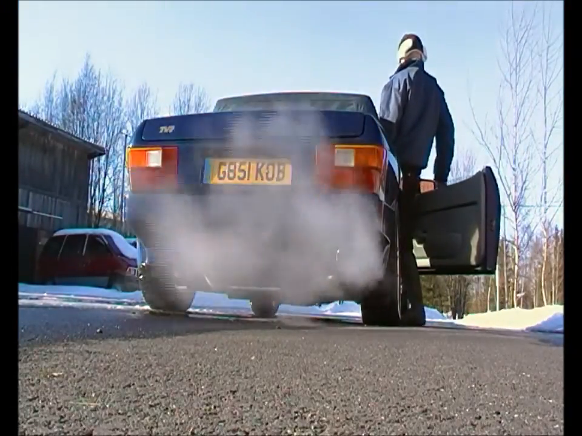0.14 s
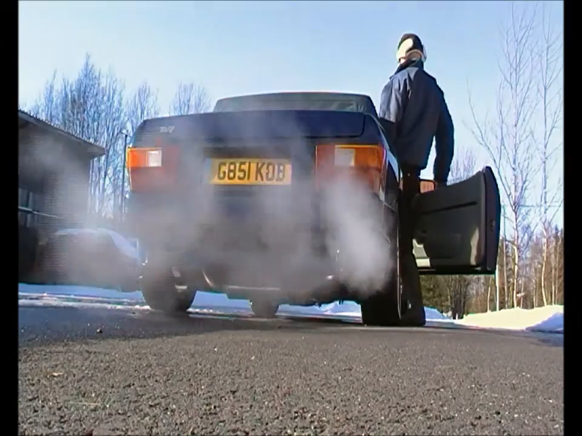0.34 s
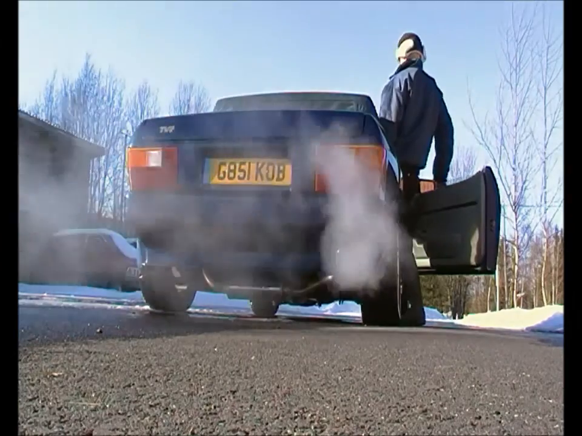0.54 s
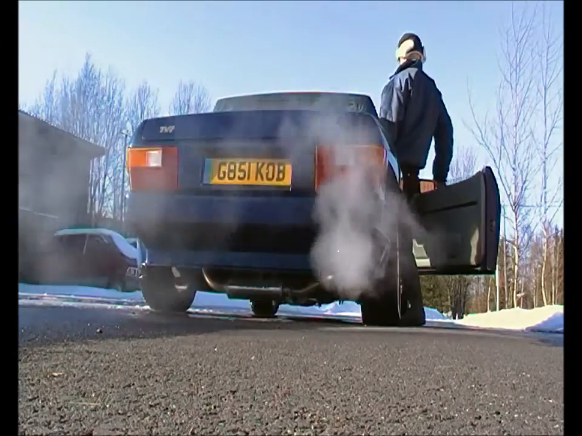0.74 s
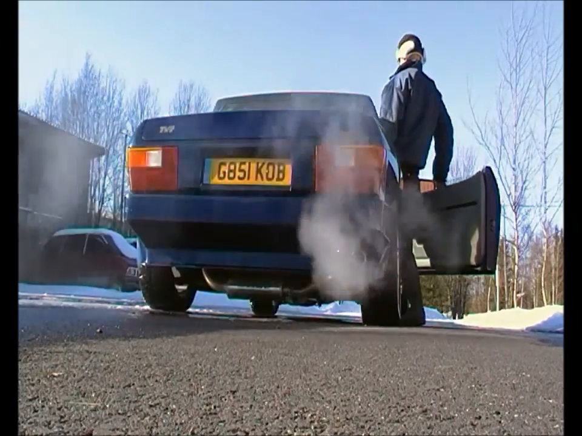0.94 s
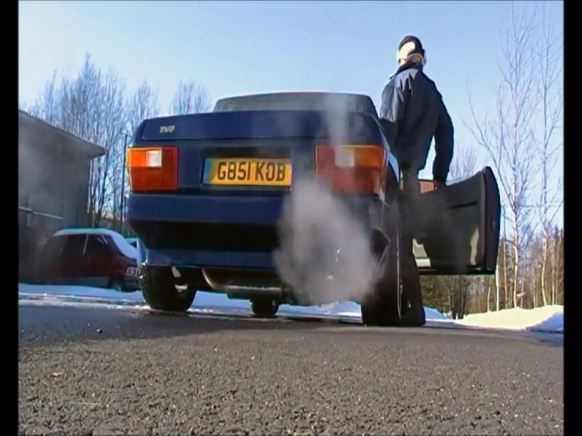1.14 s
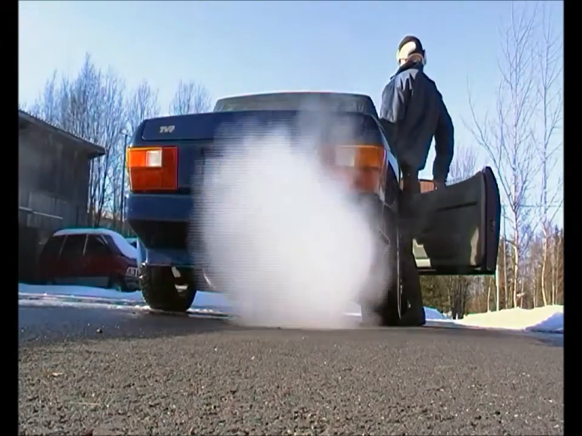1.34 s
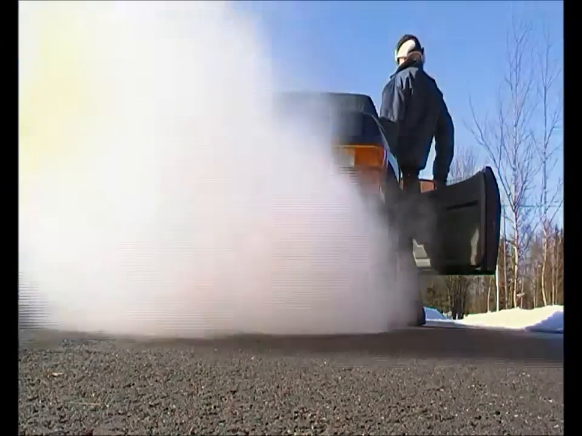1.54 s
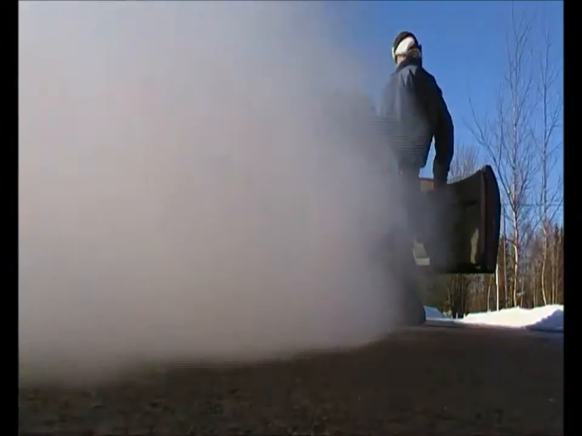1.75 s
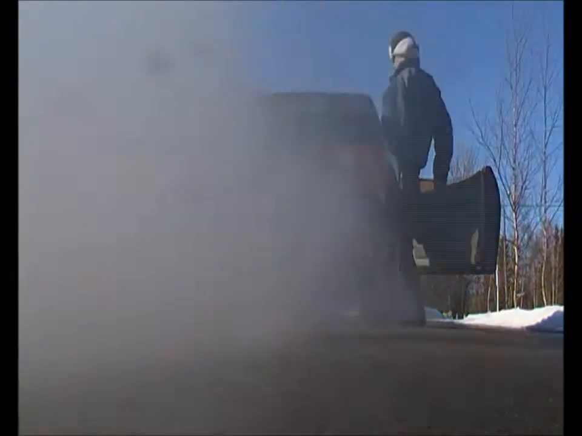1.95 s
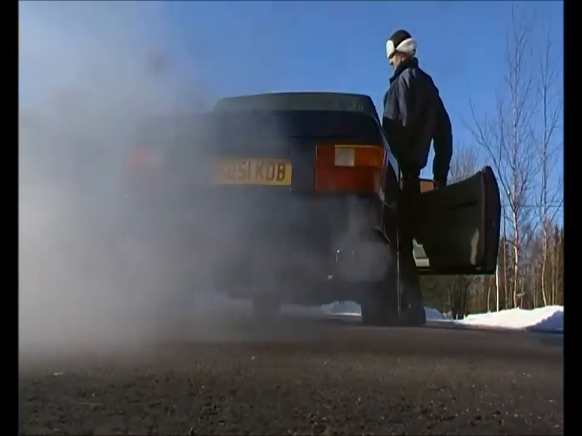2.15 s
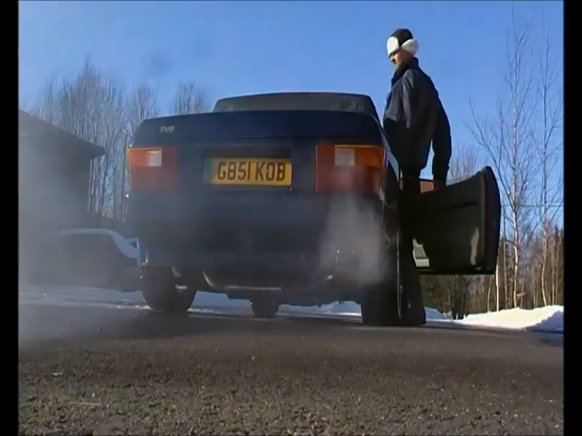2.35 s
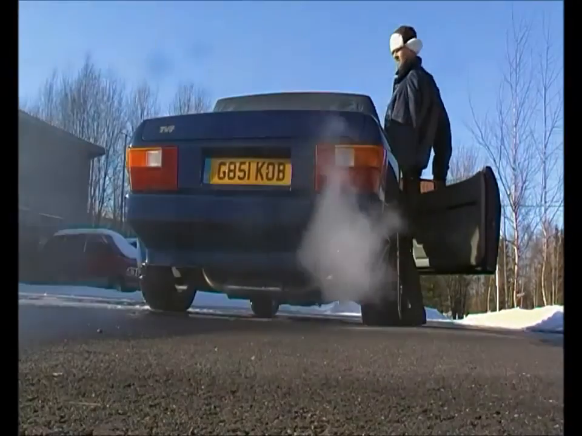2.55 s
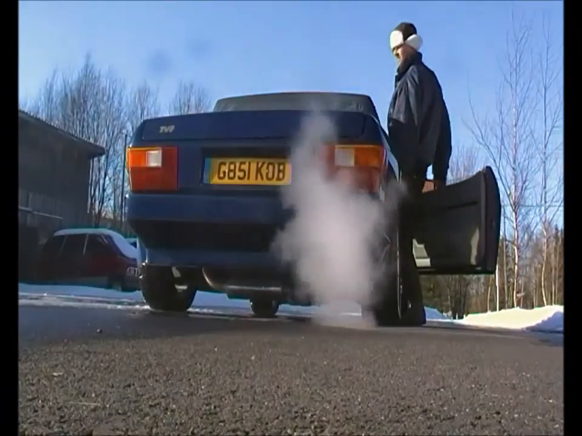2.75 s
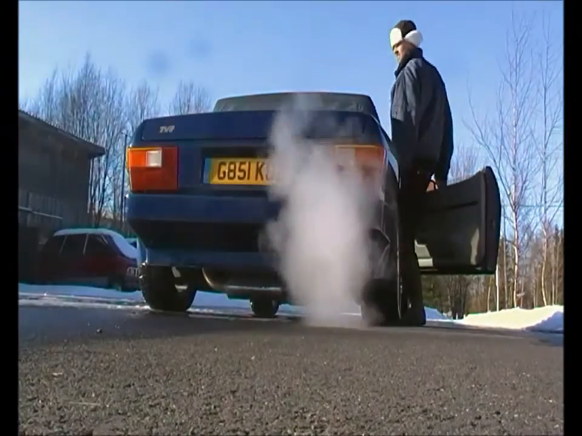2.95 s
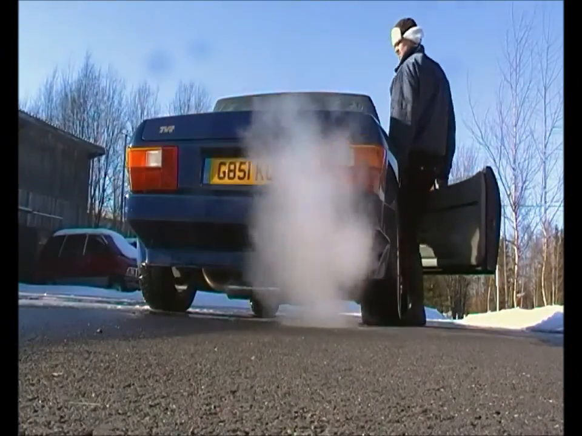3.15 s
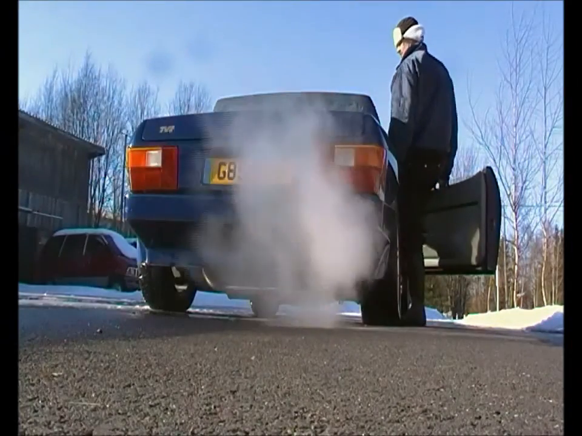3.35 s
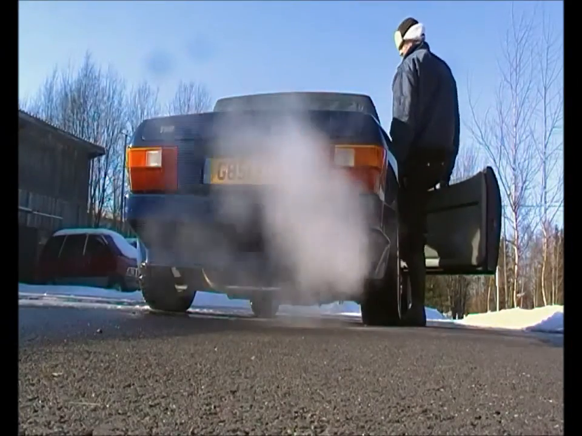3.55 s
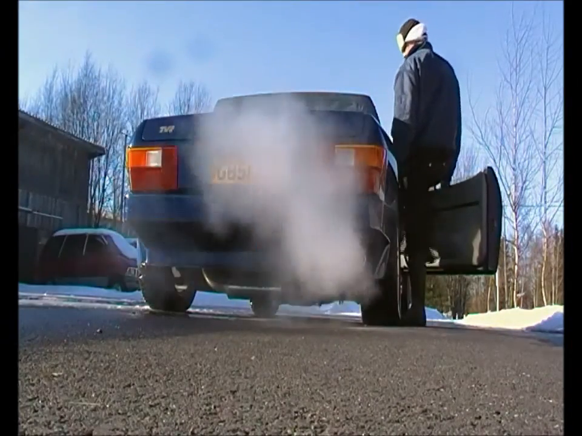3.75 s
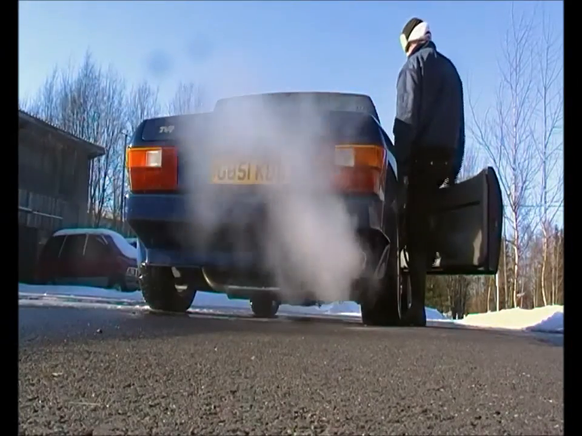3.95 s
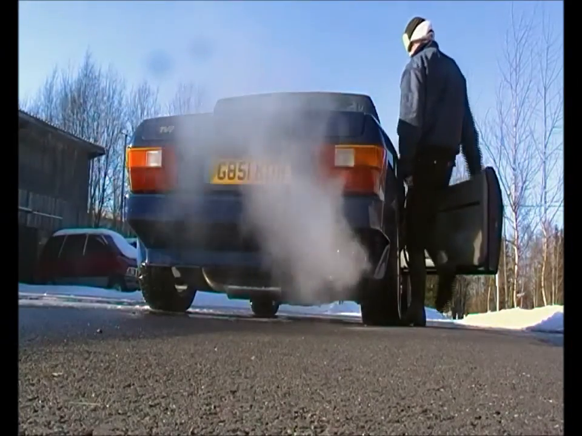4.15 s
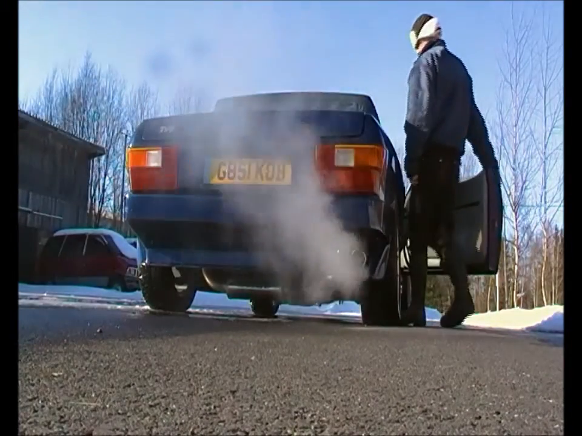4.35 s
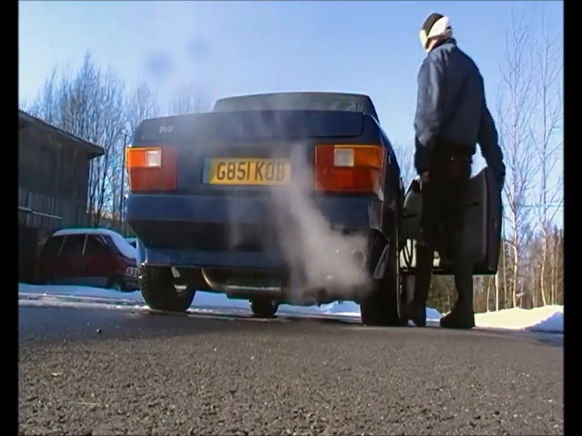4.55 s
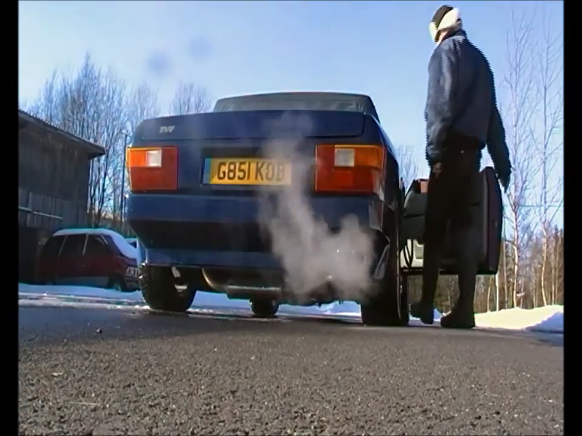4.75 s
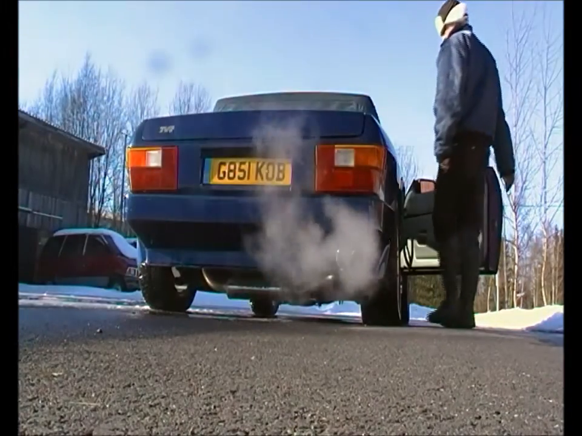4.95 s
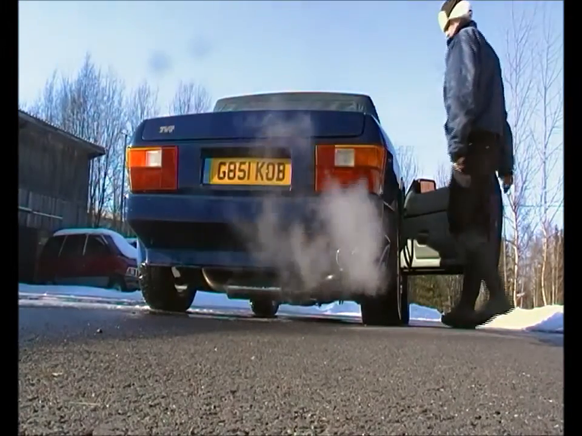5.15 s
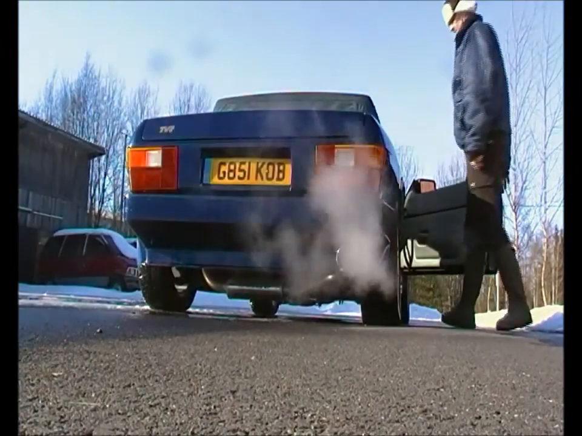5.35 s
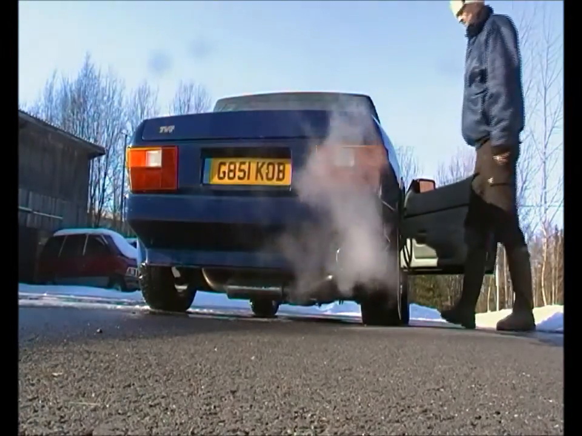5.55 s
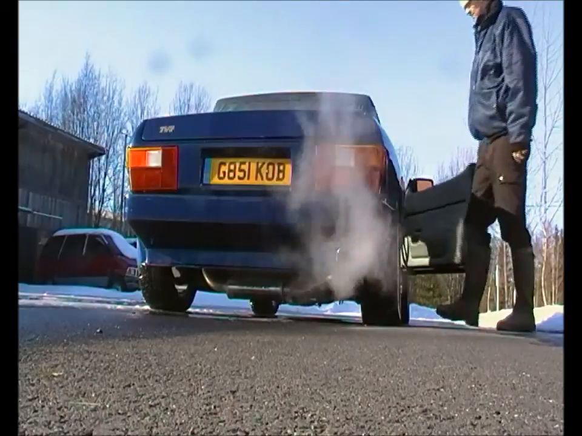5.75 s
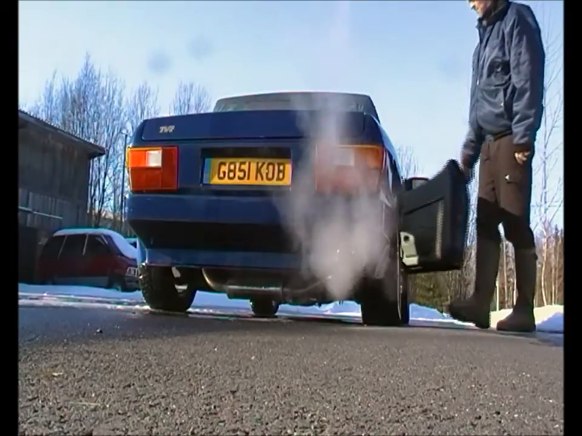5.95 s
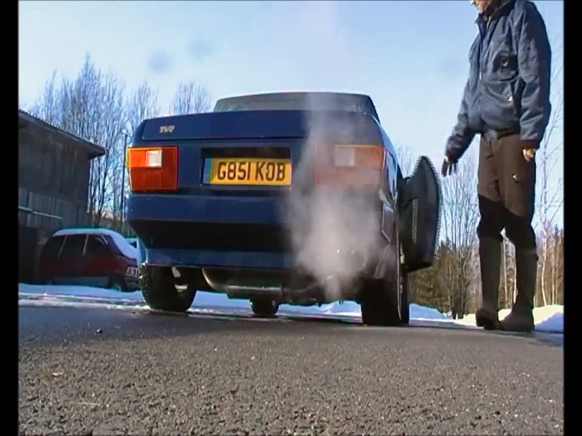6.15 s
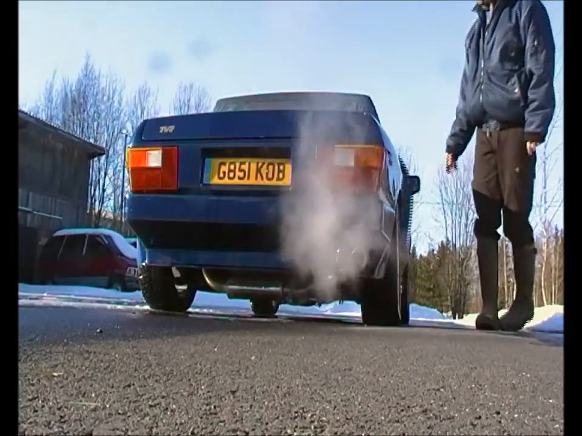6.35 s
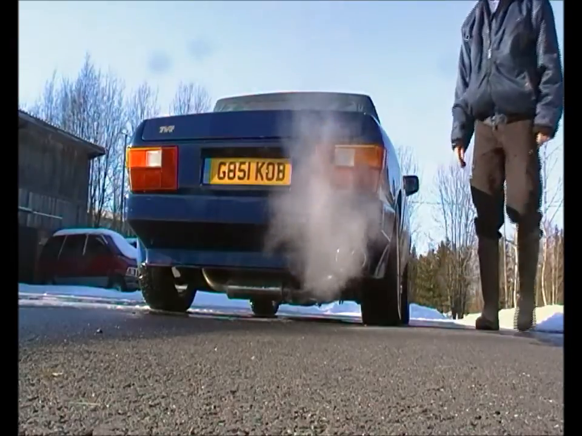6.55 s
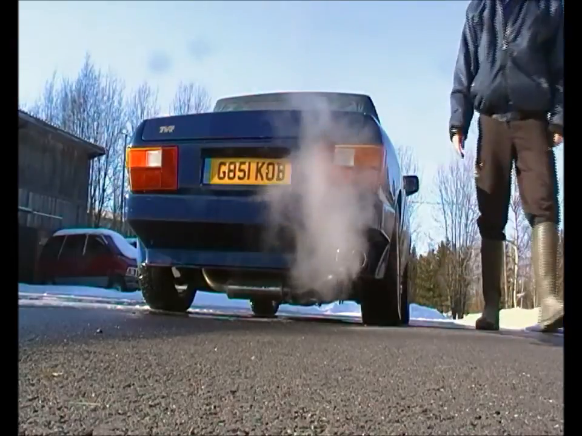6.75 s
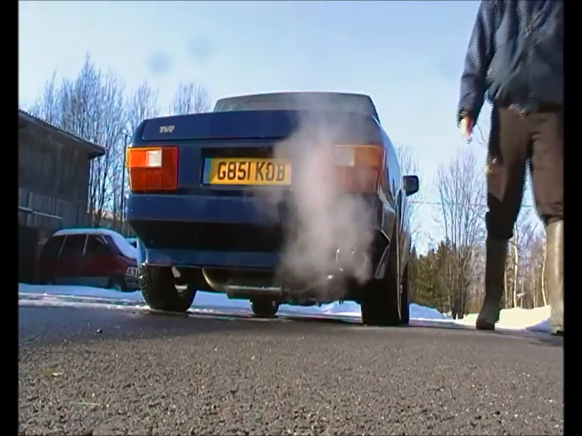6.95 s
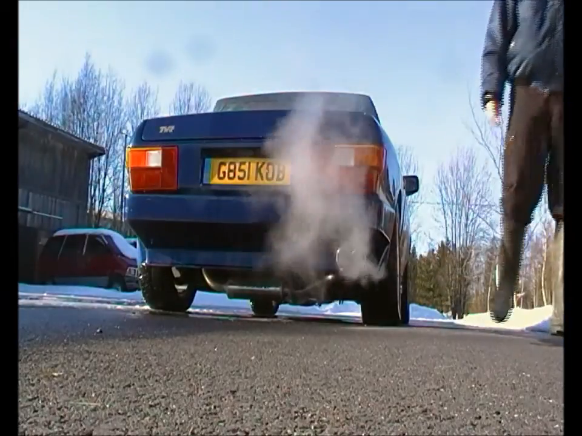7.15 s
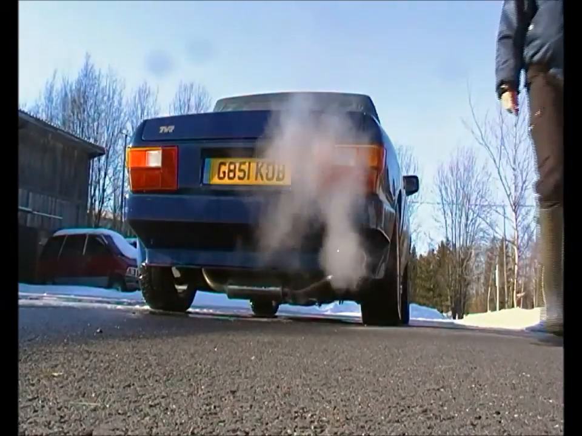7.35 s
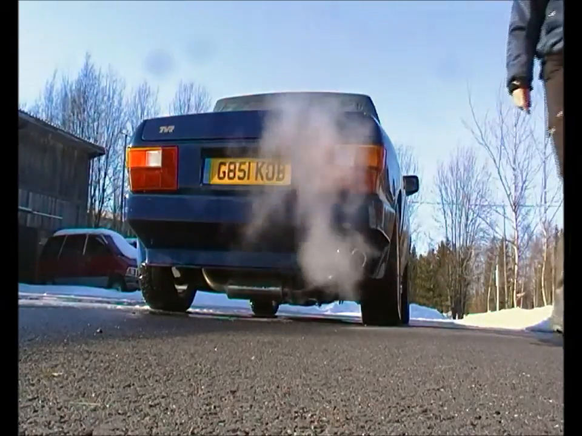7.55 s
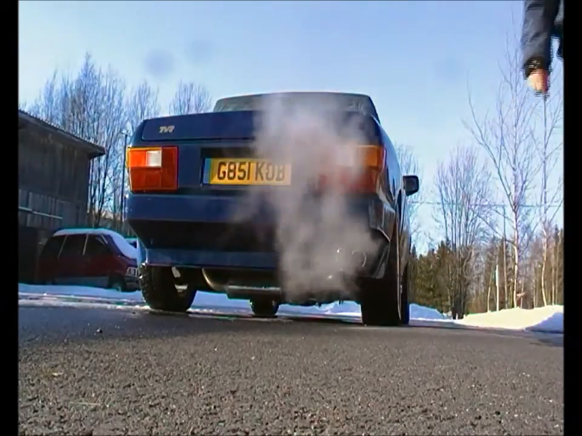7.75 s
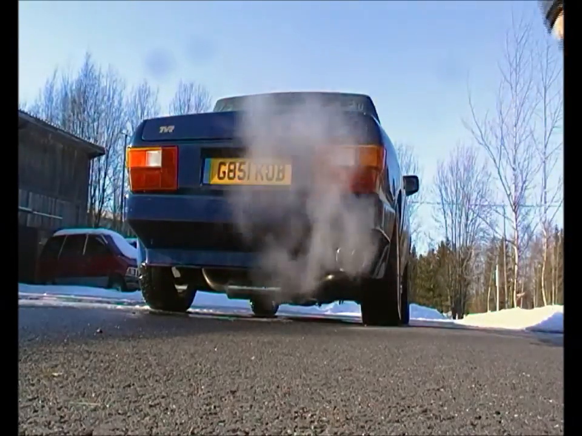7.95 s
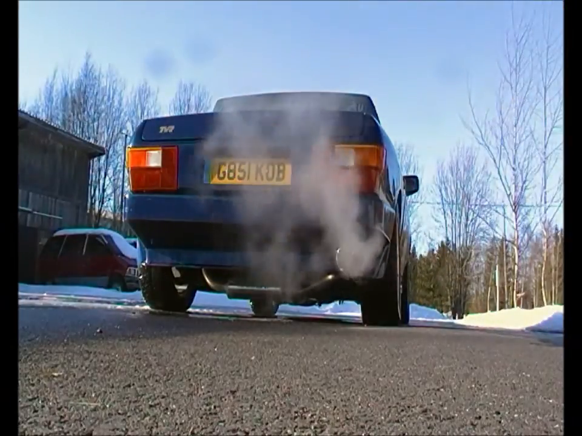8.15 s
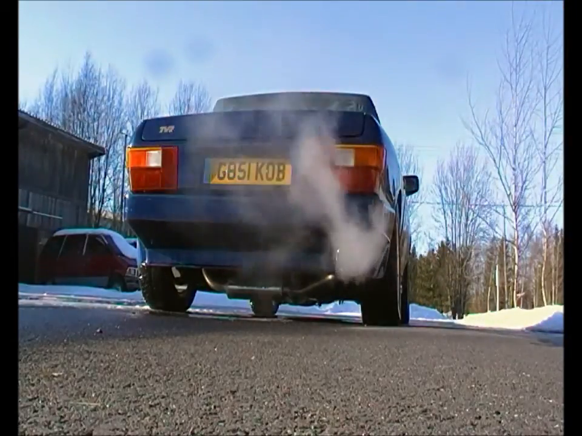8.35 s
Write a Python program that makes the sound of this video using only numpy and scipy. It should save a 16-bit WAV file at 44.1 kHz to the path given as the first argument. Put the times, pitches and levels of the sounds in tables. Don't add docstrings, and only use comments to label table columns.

```python
import sys
import numpy as np
from scipy import signal
from scipy.io import wavfile
from scipy.ndimage import uniform_filter1d

SR = 44100
rng = np.random.default_rng(int(sys.argv[2]) if len(sys.argv) > 2 else 0)


def undo_db(level):
    steps = np.asarray(level, float) / 20
    return 10 ** steps


def transcribe(u):
    v = np.clip(np.atleast_2d(u).T, -1, 1)
    q = np.round(v * 32767).astype(np.int16)
    wavfile.write(sys.argv[1], SR, q)


N = 370881

# time_s, level_db
PUFF = [
    (2.03, -53),
    (2.08, -21),
    (2.14, -15),
    (2.22, -38),
]
# pitch_hz, likeness_0_to_1
LIKENESS = [(600, .96), (1100, .92), (2000, .87), (4000, .87), (6000, .6), (11500, .56)]
# pitch_hz, level_db (per Hz)
HISS = [(450, -5.5), (700, -11), (1000, -7.5), (1300, -10), (1800, -9.5), (3000, -6.5), (4500, -12),
        (7000, -18), (9500, -18.5), (11500, -27)]
# pitch_hz, width_hz, level_db
WHISTLES = [(765, 45, 1), (1455, 50, 2.5), (1690, 30, -4), (1950, 30, -8), (2505, 40, -6), (2990, 190, -2)]
# multiple_of_cycle_rate, level_db (re hiss)
WHINES = [(34.9, -8.5), (76.5, -7.5), (121, -13), (196, -15)]
# pitch_hz, half_width_hz
CASING = [(1050, 55), (1260, 45), (1485, 85), (1850, 50), (2480, 110), (3120, 150), (4950, 200)]
# start_s, peak_db, thud_db (re peak)
DOOR = [
    (6.539, -3.5, -18),
    (6.5497, -7, -6),
    (6.558, -7, -5),
    (6.566, -13, -1),
    (6.592, -14, -3.5),
]
# pitch_hz, level_db, t60_s
DOOR_PANEL = [(211, 1.5, 0.35), (500, -8.5, 0.24), (770, -12, 0.06), (1140, -26, 0.21), (1520, -6.5, 0.26),
              (1590, -20, 0.31), (2320, -19, 0.28), (3050, -13.5, 0.074), (3880, -11.5, 0.15),
              (4339, -33, 0.13)]
# start_s, peak_db
POPS = [(0.217, -1), (2.526, 4.5), (2.559, 4.5), (2.575, -1), (2.588, -2), (2.631, -0.5), (2.643, -0.5),
        (2.692, -2), (2.706, 4), (2.721, -3), (2.778, 1.5), (2.902, 10), (2.952, 4.5), (2.961, 1),
        (2.981, 3), (3.009, -2), (3.106, 5.5), (3.135, 0.6), (3.162, 1.5), (3.169, 3), (3.301, 1.5),
        (3.327, -6), (3.515, -9), (3.55, -5.5), (3.628, -9.5), (3.802, -10), (4.163, -8), (4.436, -15),
        (4.496, -15), (4.777, -14.5)]
# pitch_hz, width_hz, level_db
SILENCER = [(56.3, 6.6, 5), (132.3, 20.6, 2)]
# pitch_hz, width_hz, level_db
TAILPIPE = [(230.3, 38.6, -0.5), (272, 58.5, 0), (414, 79, -9)]
# time_s, cycle_hz (four-stroke cycles per s), throttle (-1 shut, 0 idle, 1 open)
ENGINE = [(0, 15.2, -.6), (.5, 12.3, -.3), (.95, 10.4, 0), (1.06, 10.4, .5), (1.21, 15.1, 1),
          (1.4, 25.5, 1), (1.6, 37.2, 1), (1.7, 42.4, 1), (1.75, 43.5, .3), (1.84, 41.9, -1), (2.5, 30, -1),
          (3, 23.1, -1), (3.67, 15.8, -.85), (4.37, 11.7, -.4), (5.1, 9.4, 0), (5.76, 8.3, 0), (6.47, 8, 0),
          (8.41, 8.12, 0)]
IDLE = [-106, -94, -46, -40, -27, -20, -23, 0, -32, -33, -25, -35, -29, -22, -25, -1, -30, -14, -17, -18,
        -20, -32, -35, -18, -26, -15, -13, -21, -17, -27, -17, -9, -18, -21, -18, -34, -20, -29, -27, -22,
        -29, -25, -29, -34]
PULL = [-51, -43, -38, -24, -25, -16, -16, 0, -24, -11, -22, -20, -20, -20, -15, -3, -23, -14, -28, -17,
        -22, -15, -15, -11, -17, -24, -25, -28, -40, -21, -23, -23, -23, -21, -45, -30, -42, -26, -41, -28,
        -33, -32, -25, -49]
FULL = [-37, -27, -34, -17, -17, -7, -14, 0, -15, -3, -17, -8, -13, -10, -19, -7, -19, -8, -18, -15, -15,
        -18, -20, -17, -22, -19, -22, -22, -19, -25, -26, -29, -29, -38, -33, -26, -44, -37, -29, -30, -36,
        -61, -43, -54]
LIFT = [-35, -20, -26, -10, -8, 0, -14, -4, -19, -8, -2, -11, -21, -14, -21, -20, -22, -22, -25, -31, -27,
        -26, -28, -28, -21, -25, -28, -32, -29, -27, -32, -34, -35, -40, -39, -59, -93, -99, -101, -108,
        -106, -100, -100, -102]
RUNDOWN = [-31, -18, -21, -11, -9, -4, -2, 0, -15, -11, -8, -18, -13, -8, -14, -16, -25, -22, -27, -27, -23,
           -24, -27, -32, -24, -32, -25, -26, -26, -27, -31, -25, -34, -31, -18, -26, -36, -33, -32, -32,
           -30, -47, -54, -52]
BURBLE = [-62, -19, -2, -8, -11, -1, -6, 0, -10, -12, -12, -17, -6, -2, -5, -8, -6, -5, -11, -5, -10, -9,
          -11, -6, -13, -12, -10, -18, -16, -14, -14, -19, -20, -21, -14, -25, -21, -26, -26, -27, -34, -25,
          -29, -28]
# time_s, pattern (level_db of each multiple)
STAGES = [(0, BURBLE), (.45, IDLE), (1, IDLE), (1.14, PULL), (1.34, PULL), (1.5, FULL), (1.74, FULL),
          (1.85, LIFT), (2, LIFT), (2.2, RUNDOWN), (2.6, RUNDOWN), (3.2, BURBLE), (4.5, BURBLE),
          (5.25, IDLE)]
# time_s, level_db
FIRING = [(0, -20.5), (.4, -40.5), (.95, -42.5), (1.14, -16), (1.22, -12), (1.4, -12), (1.68, -12.5),
          (1.76, -26), (1.92, -12), (2.05, -14.5), (2.49, -15), (2.61, -21.5), (3.05, -26), (3.65, -25.5),
          (4.15, -43.5), (5.3, -32.5), (6, -30.5), (8.41, -29)]
# time_s, level_db
SURGE = [(1.04, 2), (1.16, 5.5), (1.27, -3.5), (1.55, -5), (1.73, -12), (1.87, -3), (2.5, 4.5), (2.6, .6),
         (3.05, -.1)]

IDLE_CYCLE_HZ = 8
FLOW_IDLE_DB, FLOW_DB_PER_OCTAVE = -41, 9.5
CLEAN_FROM_S, CLEAN_TO_S, CLEAN_RAMP_S = 1.2, 2.51, .08
MISFIRE_RE_FLOW_DB, MISFIRE_TOP_DB = 5.5, -21
SETTLE_DB, SETTLE_FROM_HZ, SETTLE_OVER_HZ = -10, 10.5, 2.1
CLEAN_BARK_RE_NOTE_DB = -9.5
BOOM_RE_BARK_DB, CLEAN_BOOM_DB = -2.5, -10
RASP_FLOOR_DB, RASP_AT_TOP_DB, RASP_SLOPE = -48.5, -28.5, 3
LOAD_RASP_RE_NOTE_DB, LOAD_RASP_DB_PER_HZ, COAST_RASP_DB = -8, .45, -7
TILT_DB, TILT_PER_FLOW = -0.5, .08
INTAKE_TILT_DB, INTAKE_TO_HZ, INTAKE_OVER_HZ = 6, 35.4, 8.4
POP_RING_HZ = 417
SHOCK_FROM_HZ, SHOCK_OVER_HZ = 22, 14
SNAP_DB_PER_MULTIPLE, SNAP_TO_HZ, SNAP_OVER_HZ = 0.37, 21, 6
MUFFLE_S, MUFFLE_WIDTH_S, MUFFLE_DB = 2.1, .045, -3.5
DOOR_SWINGS_S, DOOR_SHUT_S, OPEN_DOOR_DB = 5.9, 6.55, 2
BANK_OFFSET_RAD = .8


def rms_one(x):
    return x / np.sqrt(np.mean(x ** 2) + 1e-20)


def evened(x, seconds):
    return x / np.sqrt(uniform_filter1d(x ** 2, size=int(seconds * SR)) + 1e-12)


def in_time(rows):
    s, *columns = np.transpose(rows)
    return [np.interp(np.arange(N) / SR, s, c) for c in columns]


def at_hz(points, hz):
    pitch_hz, value = np.transpose(points)
    return np.interp(np.log(hz), np.log(pitch_hz), value)


def drift(rate):
    r = np.exp(-80 * np.pi * rate / SR)
    slow = signal.lfilter([1], [1, -2 * r, r * r], rng.standard_normal(N // 40 + 2002))[2000:]
    return np.interp(np.arange(N) / 40, np.arange(len(slow)), rms_one(slow))


def resonate(x, hz, width_hz):
    r = np.exp(-np.pi * width_hz / SR)
    poles = [1, -2 * r * np.cos(2 * np.pi * hz / SR), r * r]
    return signal.lfilter([(1 - r * r) / 2, 0, (r * r - 1) / 2], poles, x)


def pipe(x, modes):
    return sum((-1) ** k * undo_db(db) * resonate(x, hz, width) for k, (hz, width, db) in enumerate(modes))


def band(x, low_hz, high_hz):
    return signal.sosfilt(signal.butter(2, [low_hz, high_hz], "band", fs=SR, output="sos"), x)


def dying(x, t60):
    return signal.lfilter([1], [1, -undo_db(-60 / (t60 * SR))], x)


def spread(mono, side_db, low_hz):
    side = undo_db(side_db) * band(np.roll(mono, 310), low_hz, 9900)
    return np.array([mono + side, mono - side])


def buffet():
    common, left, right = band(rng.standard_normal((3, N)), 23, 263)
    return undo_db(in_time(PUFF)[0]) * rms_one(np.array([common + 1.1 * left, common + 1.1 * right]))


def whine(cycles, cycle_hz, throttle):
    out = 0
    for order, db in WHINES:
        tone_hz = order * cycle_hz[::40]
        through = sum(np.exp(-((tone_hz - hz) / width_hz) ** 2) for hz, width_hz in CASING)
        through = np.interp(np.arange(N), np.arange(N)[::40], through)
        out = out + undo_db(db + 1.5 * drift(12)) * (.2 + through) * np.sin(2 * np.pi * order * cycles)
    return out * np.clip(.4 - throttle, 0, 1) * np.clip((cycle_hz - 11) / 8, 0, 1)


def hiss(tilt_db, gate, whistle_db, patchy_db):
    out, together = 0, drift(3.0)
    edges = 450 * 2 ** np.arange(0, 4.9, .3)
    white = rng.standard_normal((2, 2, N))
    for k, (low, high) in enumerate(zip(edges, edges[1:])):
        mid, side = band(white[k % 2], low, high)
        hz = np.sqrt(low * high)
        alike = np.clip(at_hz(LIKENESS, hz), 0, 1)
        flicker_db = patchy_db * (0.26 * together + drift(10.0))
        gain = undo_db(at_hz(HISS, hz) + tilt_db * np.log2(max(hz, 2000) / 3000) + flicker_db)
        out = out + gain * (np.sqrt(1 + alike) * mid + np.sqrt(1 - alike) * side * [[1], [-1]])
    door_db = np.interp(np.arange(N) / SR, [DOOR_SWINGS_S, DOOR_SHUT_S], [OPEN_DOOR_DB, -OPEN_DOOR_DB])
    whistle = 0
    for (hz, width, db), favour in zip(WHISTLES, [1, -1, -1, 0, 0, 0]):
        tone = rms_one(resonate(resonate(white[0, 0], hz, width), hz, width))
        whistle = whistle + undo_db(db + favour * door_db) * tone
    return gate * (rms_one(out) + undo_db(whistle_db) * whistle)


def door():
    rattle, thud = np.full(N, 1e-18), np.full(N, 1e-18)
    for s, db, thud_db in DOOR:
        at = round(s * SR)
        rattle[at], thud[at] = undo_db(db), undo_db(db + thud_db)
    noise = rng.standard_normal((2, N))
    crack = undo_db(0.5) * band(band(dying(rattle, 0.032) * noise[0], 2300, 4220), 1500, 8200)
    body = undo_db(-0.5) * band(dying(thud, 0.15) * noise[1], 100, 1570)
    excite = dying(rattle, 0.048) * noise[1]
    ring = sum(undo_db(db + 16.5) * resonate(excite, hz, 4.7 / t60) for hz, db, t60 in DOOR_PANEL)
    return spread(crack + body + ring, -12, 300) * undo_db([[.3], [-.3]])


def pops():
    out, age = np.zeros(N + 4000), np.arange(4000) / SR
    for s, db in POPS:
        strength = np.clip((db + 22) / 24, 0, 1)
        hz = POP_RING_HZ * (0.642 + 0.319 * strength)
        pulse = np.sin(2 * np.pi * hz * age) * np.exp(-(age * hz / 1.03) ** 1.62)
        pulse += 0.14 * np.sin(2 * np.pi * 1.177 * hz * age) * age / 0.0057 * np.exp(-age / 0.007)
        pulse += .2 * strength * np.sin(2 * np.pi * 1500 * age) * np.exp(-age / .0012)
        pulse *= 1 - np.exp(-age / (.0012 - .001 * strength))
        at = round((s + 0.003124) * SR)
        out[at:at + 4000] += undo_db(db) * pulse
    return spread(band(out[:N], 90, 9000), -20, 500)


def firings(cycles):
    at = np.flatnonzero(np.diff(np.floor(8 * cycles))) + 1
    luck = rng.standard_normal((len(at), 2))
    late = (0.00184 * SR * luck[:, 1]).astype(int)
    clicks = np.full(N, 1e-18)
    np.add.at(clicks, np.clip(at + late, 0, N - 1), luck[:, 0])
    return clicks


def regular(cycles, cycle_hz, throttle):
    out, power, t = 0, 0, np.arange(N) / SR
    slow_t = t[::40]
    times, patterns = zip(*STAGES)
    load = np.clip(throttle, 0, 1)
    steep = 2 * np.pi / 3 * load * np.clip((cycle_hz - SHOCK_FROM_HZ) / SHOCK_OVER_HZ, 0, 1)
    low_speed = np.clip((SNAP_TO_HZ - cycle_hz) / SNAP_OVER_HZ, 0, 1)
    snap = undo_db(SNAP_DB_PER_MULTIPLE * load ** 3 * low_speed)[::40]
    unsteady_db = .7 + .4 * abs(throttle)
    for k, levels_db in enumerate(np.transpose(patterns), 1):
        gain = np.interp(slow_t, times, undo_db(levels_db)) * snap ** k
        firing = k % 8 == 0
        loose = rng.normal(0, 1.3 if k < 22 else .8) * (not firing)
        tight = rng.uniform(-np.pi, np.pi) if k % 2 else BANK_OFFSET_RAD * np.sin(k * np.pi / 4)
        wobble = undo_db((unsteady_db * (.6 if firing else 2) * drift(3 + k / 3))[::40])
        turn = k * np.pi / 4 + loose + load * (tight - loose) - steep
        out = out - np.interp(t, slow_t, gain * wobble) * np.cos(2 * np.pi * k * cycles + turn)
        power = power + gain ** 2 / 2
    return out / np.interp(t, slow_t, np.sqrt(power))


def levels(cycle_hz, throttle):
    t, (note_db,), (surge_db,) = np.arange(N) / SR, in_time(FIRING), in_time(SURGE)
    inside_s = np.minimum(t - CLEAN_FROM_S, CLEAN_TO_S + CLEAN_RAMP_S - t)
    clean = np.clip(inside_s / CLEAN_RAMP_S, 0, 1)
    load = np.clip(throttle, 0, 1)
    flow_db = FLOW_IDLE_DB + FLOW_DB_PER_OCTAVE * np.log2(cycle_hz / IDLE_CYCLE_HZ)
    settled = np.clip((SETTLE_FROM_HZ - cycle_hz) / SETTLE_OVER_HZ, 0, 1)
    misfire_db = np.minimum(flow_db + MISFIRE_RE_FLOW_DB, MISFIRE_TOP_DB) + SETTLE_DB * settled
    bark_db = clean * (note_db + CLEAN_BARK_RE_NOTE_DB) + (1 - clean) * misfire_db
    boom_db = bark_db + BOOM_RE_BARK_DB + CLEAN_BOOM_DB * clean
    coast_db = RASP_AT_TOP_DB + RASP_SLOPE * (bark_db - MISFIRE_TOP_DB) + COAST_RASP_DB * clean
    coast_db = np.maximum(RASP_FLOOR_DB, coast_db)
    load_db = note_db + LOAD_RASP_RE_NOTE_DB + LOAD_RASP_DB_PER_HZ * (cycle_hz - 30)
    rasp_db = load * load_db + (1 - load) * coast_db
    hiss_db = flow_db + surge_db
    intake = load ** 2 * np.clip((INTAKE_TO_HZ - cycle_hz) / INTAKE_OVER_HZ, 0, 1)
    tilt_db = TILT_DB + TILT_PER_FLOW * (hiss_db + 25.5) + INTAKE_TILT_DB * intake
    return note_db, boom_db, bark_db, rasp_db, hiss_db, tilt_db


def engine():
    cycle_hz, throttle = in_time(ENGINE)
    note_db, boom_db, bark_db, rasp_db, hiss_db, tilt_db = levels(cycle_hz, throttle)
    cycles = np.cumsum(cycle_hz) / SR
    note = regular(cycles, cycle_hz, throttle)
    note = note * undo_db(1.2 * abs(throttle) * drift(45) - .2 * abs(throttle))
    misfire = evened(firings(cycles), seconds=0.39)
    misfire = misfire + 1.0 * rng.standard_normal(N)
    boom = evened(pipe(band(misfire, 30, 285), SILENCER), seconds=.2)
    bark = evened(pipe(band(band(misfire, 128, 430), 128, 746), TAILPIPE), seconds=.13)
    bark = bark * (1 + .4 * (1 - abs(throttle)) * np.cos(2 * np.pi * (cycles + .125)))
    push = np.clip(-note, -2.5, 2.5)
    rasp = rms_one(band(rng.standard_normal(N) * (1 + .7 * push), 550, 1250))
    tones = undo_db(note_db) * note + undo_db(boom_db) * boom + undo_db(bark_db) * bark + undo_db(rasp_db - 4.5) * rasp
    tones = spread(tones, -17, 550)
    outflow = hiss(tilt_db, 1 + 0.012 * push, -17 - 11 * abs(throttle), patchy_db=1.32)
    return tones + undo_db(hiss_db) * (outflow + whine(cycles, cycle_hz, throttle))


def scene():
    muffle = undo_db(MUFFLE_DB * np.exp(-((np.arange(N) / SR - MUFFLE_S) / MUFFLE_WIDTH_S) ** 2))
    return muffle * engine() + pops() + door() + buffet()


def top_cut(x):
    return signal.sosfilt(signal.butter(12, 12010, fs=SR, output="sos"), x)


def record(dry):
    heard = signal.sosfilt(signal.butter(1, 25, "high", fs=SR, output="sos"), dry)
    heard = signal.sosfilt(signal.cheby2(16, 50, 11900, fs=SR, output="sos"), heard)
    return top_cut(np.clip(heard, -1, 1))


dry = scene()
out = record(dry)
transcribe(out)
```